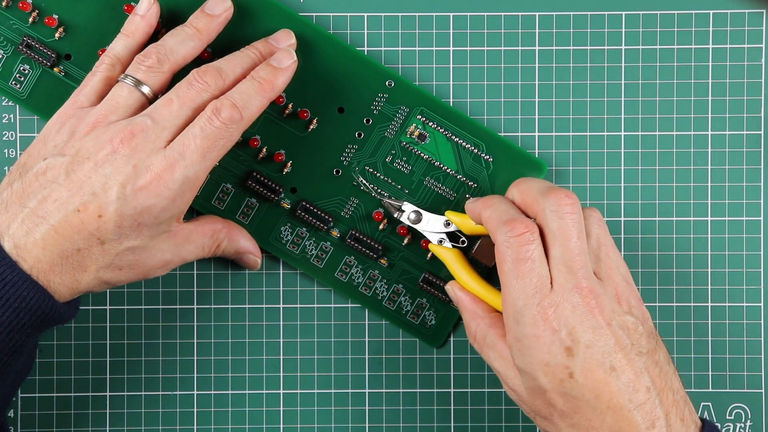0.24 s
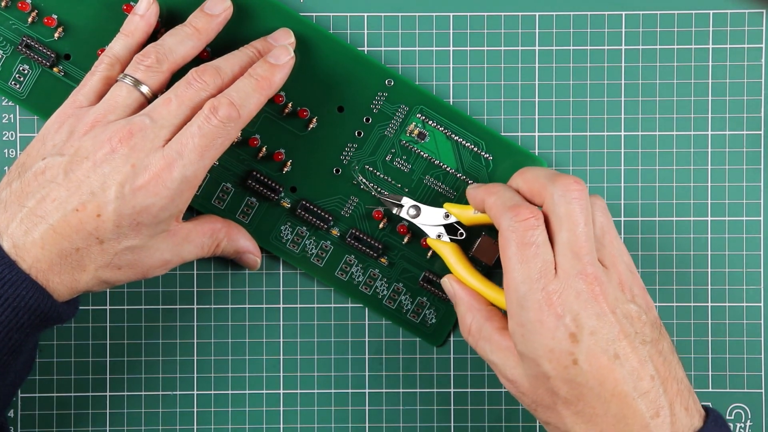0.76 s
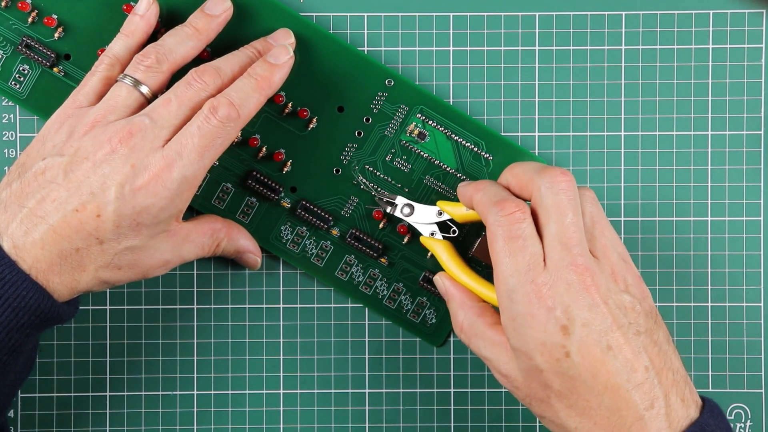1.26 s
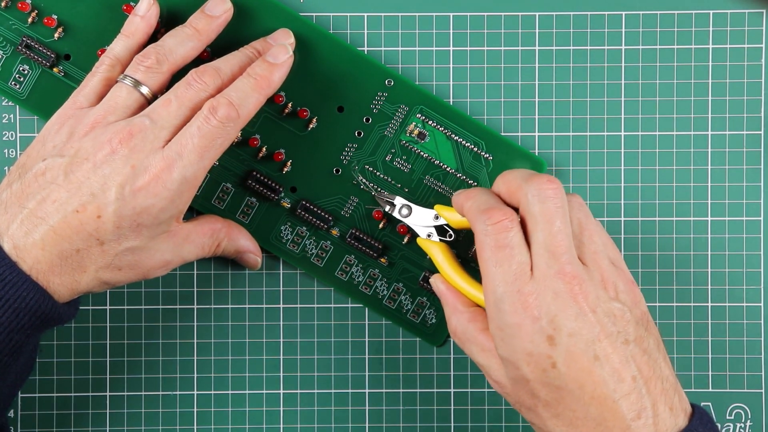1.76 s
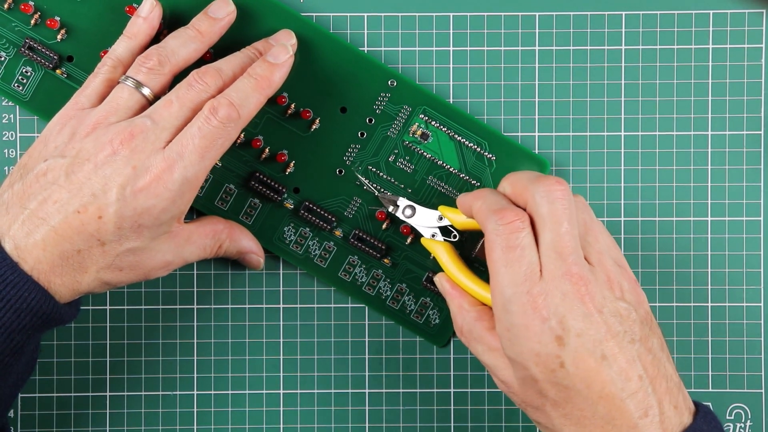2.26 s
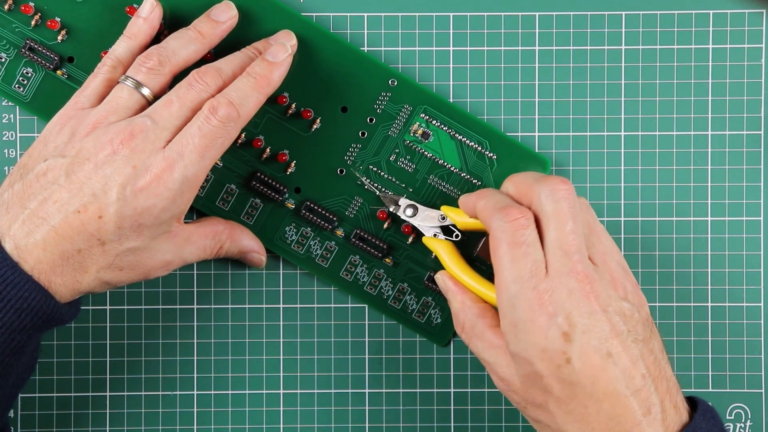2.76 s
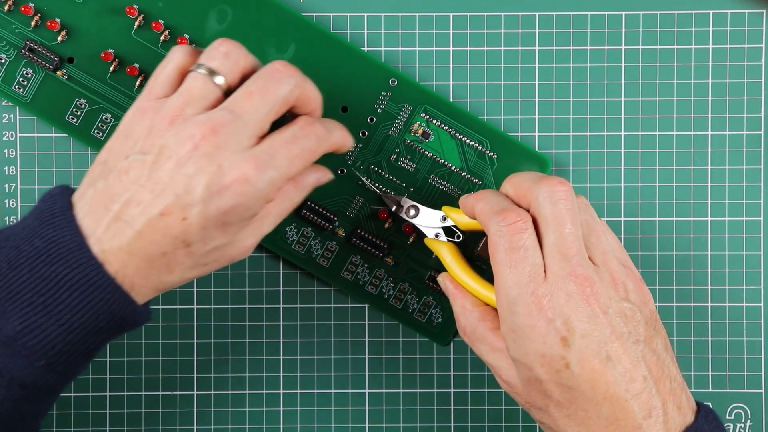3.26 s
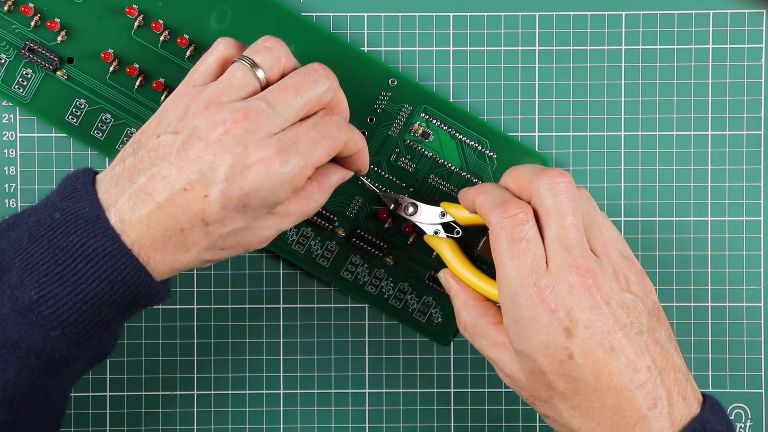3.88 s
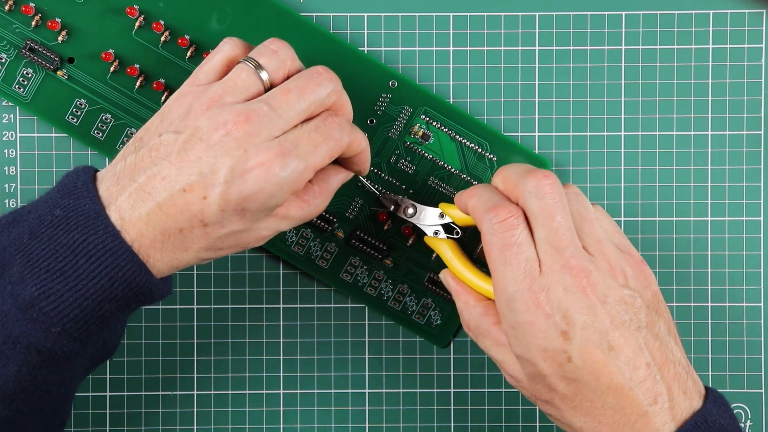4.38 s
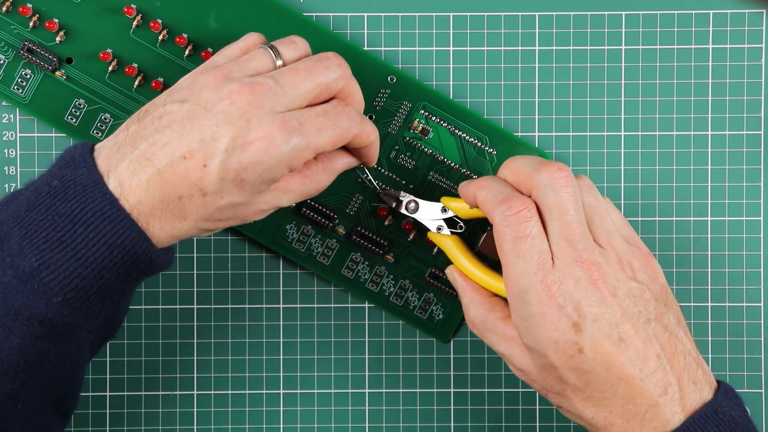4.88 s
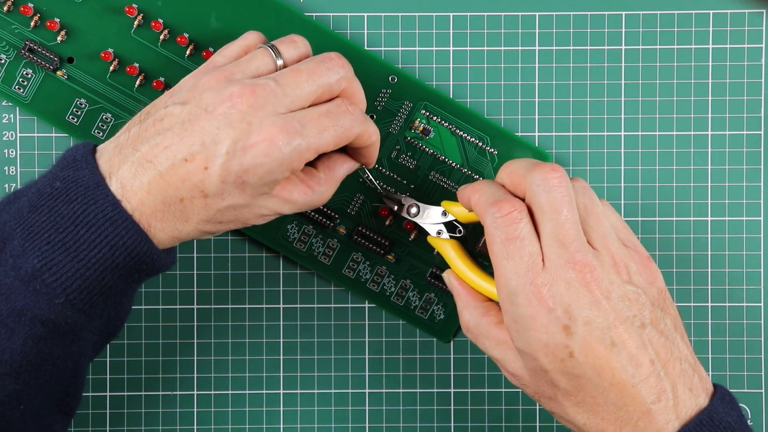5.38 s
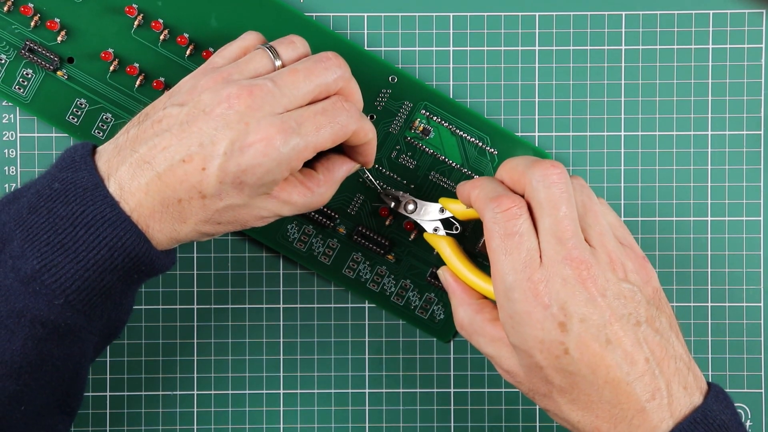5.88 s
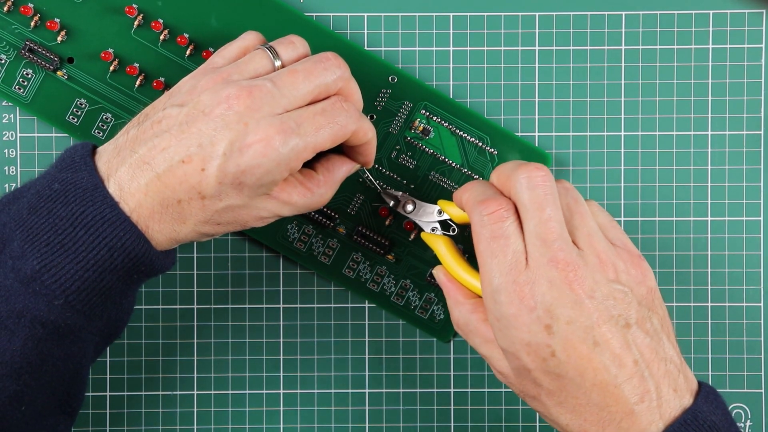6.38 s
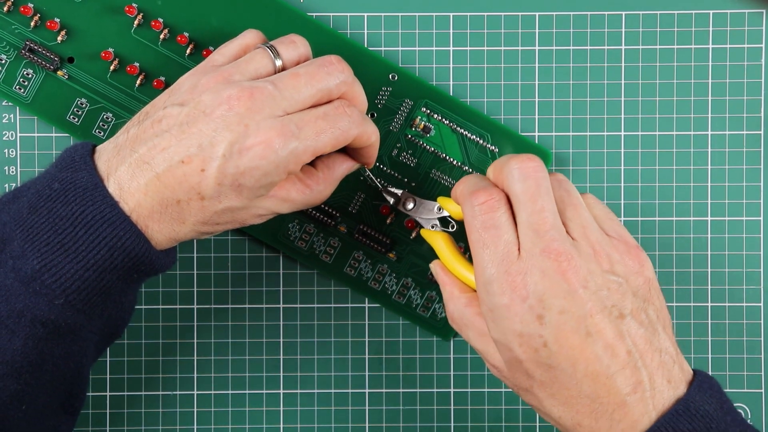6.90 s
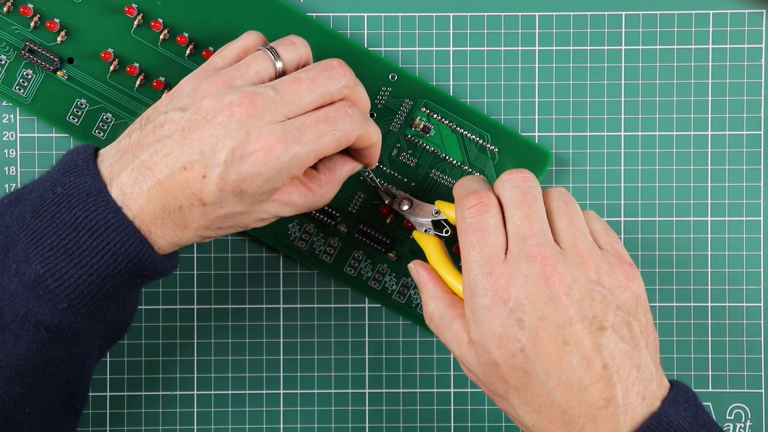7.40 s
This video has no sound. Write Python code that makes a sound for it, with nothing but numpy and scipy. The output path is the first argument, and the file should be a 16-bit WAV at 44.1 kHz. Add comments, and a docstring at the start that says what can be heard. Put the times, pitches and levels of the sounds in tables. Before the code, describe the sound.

Side cutters snip two wire leads off a circuit board with sharp steel cracks, then small ticks, knocks and rubs in a quiet room.

```python
"""Under everything: uneven low rumble and a faint hiss that sinks after loud sounds, in a slightly live room.
At 0.4 s side cutters snip a wire lead off a circuit board: filtered noise bursts crack in steel resonances.
Jaws, leads and fingers then tick, ping, rub and softly bump on the board until the second snip at 2.1 s.
The board knocks on its mat; a finger squeaks at 3.1 s in unsteady sines; small touches go on, with a deep
bench swell at 4.7 s, the busiest ticking from 5.2 to 5.5 s, and a last wire ping at 7.6 s."""
import sys
import numpy as np
from scipy import signal
from scipy.fft import rfft, irfft, next_fast_len
from scipy.io import wavfile
from scipy.ndimage import uniform_filter1d, map_coordinates

SR = 44100
rng = np.random.default_rng(int(sys.argv[2]) if len(sys.argv) > 2 else 0)


def master_out(mix):
    """Clip the mix to full scale and print it as 16-bit PCM to the path in sys.argv[1]."""
    frames = np.transpose(np.atleast_2d(mix))
    ceiling = np.clip(frames, -1, 1)
    pcm = np.round(ceiling * 32767).astype(np.int16)
    wavfile.write(sys.argv[1], SR, pcm)


N = 337365

# rumble spectrum: freq_hz, density_db_per_hz (relative)
RUMBLE_SPECTRUM = [(15, -11.5), (25, -3), (37, -6.5), (50, -1.5), (80, -4), (120, -10), (200, -14),
                   (300, -26), (500, -37), (1500, -90)]
# rumble level over time: time_s, level_db
RUMBLE_LEVEL = [(0, -63), (2.6, -63), (4.55, -62.5), (5.4, -61), (6.2, -66), (7.65, -61)]
# hiss spectrum: freq_hz, density_db_per_hz (relative)
HISS_SPECTRUM = [(200, -12), (400, -5.5), (1000, 0.5), (2000, -5), (4000, -5.5), (8000, -5), (12000, -5.5),
                 (13000, -2.5), (15500, -5.5)]
HISS_DB = -69  # before it sinks
# rate at which a past sound is forgotten: freq_hz, rate_db_per_s
SINK_RETURN = [(400, 43), (2500, 38), (8000, 50.5), (13000, 95)]
# limit of the hiss sinking: freq_hz, depth_db
SINK_DEEPEST = [(400, 19), (3000, 28), (12000, 26), (12600, 15)]
SINK_DELAY_S, SINK_DB_PER_DB, SINK_THRESHOLD_DB = .25, 0.89, 6.5  # threshold is above the hiss

# late room decay: freq_hz, t60_s
ROOM_T60 = [(150, 0.94), (500, 0.42), (1500, 0.48), (3000, 0.55), (7000, 0.37), (11000, 0.31),
            (15000, 0.72)]
# late room spectrum: freq_hz, level_db
ROOM_COLOUR = [(200, -1), (450, 2.5), (1200, 1), (2500, -4.5), (8000, -3), (12000, -4.5), (15000, -5.5)]

# modes of the board on its mat: freq_hz, width_hz, level_db
BOARD = [(310, 20, 0.5), (460, 330, 11), (596, 23, 4), (634, 6.7, -7.5), (817, 44, -8.5), (935, 40, -2),
         (1300, 41, -13.5)]
# modes of the cutters' arms: freq_hz, width_hz, level_db
ARMS = [(1907, 170, 4.5), (2100, 160, 1.5), (2140, 81, -6.5)]
# modes of the cutters' jaws: freq_hz, width_hz, level_db
JAWS = [(2760, 300, 0), (3043, 140, -2), (3380, 160, -5), (3870, 170, 0), (4140, 110, 0), (4470, 130, -4)]
# higher steel modes: freq_hz, width_hz, level_db
RING = [(5600, 400, -7), (6850, 300, -4), (7215, 200, 2), (7840, 300, -2), (8350, 220, -1)]
# highest steel modes, the crack: freq_hz, width_hz, level_db
CRACK = [(8750, 450, 0), (10320, 600, 0), (11330, 500, 0), (12040, 400, -4), (12800, 500, -5),
         (14500, 1200, -15)]
# vibrating parts in the order board, arms, jaws, ring, crack: modes, low_hz, high_hz
PARTS = [(BOARD, 250, 1350), (ARMS, 1300, 2600), (JAWS, 2500, 4700), (RING, 4700, 8600),
         (CRACK, 8400, 14300)]
# tones that ring on after a blow: freq_hz, level_db, t60_s
AFTER_RING = [(311, -2, .45), (436, 0, .36), (583, -6, .35), (1028, -8, .45), (1265, -6, .4),
              (1550, -11, .36), (3068, -9, .6), (7200, -7, .28)]

FIDGET_COUNT, FIDGET_SPAN_S = 8, (3.0, 7.5)
FIDGET_DB, FIDGET_SPREAD_DB = -74, 8.5  # mean, plus or minus spread
# fingers and leads slide: centre_s, scrape_db, hardness_hz, fizz_db, half_s
RUBS = [(0.716, -84, 2000, -52.5, 0.024), (1.037, -60, 800, -66, 0.039), (3.088, -63.5, 6050, -57.5, 0.069),
        (3.349, -56.5, 5000, -54.5, 0.032), (4.76, -66.5, 4560, -67, 0.064),
        (4.93, -75.5, 6030, -60, 0.088), (6.997, -56.5, 4430, -59.5, .023)]
# short unsteady tones, a soft bump at 0.95 s, then fingertip squeaks near 3.1 s:
# centre_s, half_s, pitch_hz, level_db
UNSTEADY_TONES = [(.953, 0.0046, 520, -44.5), (3.087, 0.0056, 1236, -53.5), (3.116, 0.026, 1282, -48.5)]
# a wire end is flicked or lands: start_s, level_db
PINGS = [(0.46, -40), (0.485, -44.5), (0.547, -52), (0.739, -72), (0.947, -63.5), (1.01, -60),
         (1.277, -55.5), (7.6289, -46)]
# ping in each of PARTS: level_db
PING_COLOUR_DB = [-24.5, -16.5, -12.5, -0.5, -8]
PING_T60_S = 0.082
# cutters and leads touch the board: start_s, knock_db, hardness_hz, tick_db, rattle_t60_s
CONTACTS = [(0.4557, -39, 3950.0, -58.6, 0.028), (0.657, -47.5, 3160, -60.4, 0.055),
            (0.688, -64.5, 2170, -53, 0.02), (0.763, -57.5, 950, -61.5, 0.06),
            (1.0918, -47, 1340, -70.5, 0.086), (1.262, -55.5, 1110.0, -58.5, 0.26),
            (1.3305, -44, 1560, -53.7, 0.043), (2.254, -57, 7130.0, -58, 0.013),
            (3.043, -67.5, 4480, -73, 0.012), (3.075, -64, 5480, -49, 0.04),
            (3.137, -63.5, 3950, -82, 0.0084), (3.3311, -55, 6500, -47, 0.048),
            (3.502, -68, 5140.0, -70, 0.1), (3.9319, -64.5, 3320.0, -76, 0.011),
            (4.1916, -53.0, 3700, -56, 0.02), (4.4066, -63.5, 1030, -76.5, 0.086),
            (4.55, -61, 1053, -68.5, 0.15), (5.228, -43.5, 1570, -55, 0.015),
            (5.2354, -43.5, 1590, -59, 0.1), (5.2879, -49, 1550.0, -53, 0.027),
            (5.3322, -45.4, 2040, -51, 0.043), (5.434, -36.8, 2800, -48.5, 0.091),
            (5.4719, -36, 3570, -49, 0.016), (5.643, -62.5, 2540, -62.5, 0.046),
            (5.894, -61.0, 2066, -74, 0.093), (6.391, -52.5, 710, -57.5, 0.13),
            (6.715, -68.8, 2580, -92, 0.075), (7.13, -65, 2700, -78.2, 0.027),
            (7.19, -56, 1120, -66.5, 0.041), (7.3587, -48, 2140.0, -64.5, 0.019)]
# wire tick in each of PARTS: level_db
TICK_COLOUR_DB = [-33, -15, -9.5, -8, 1]
AFTER_CONTACT_DB = -15  # after-ring re knock
# board rocks onto the mat: start_s, direct_peak_db, pitch_hz
KNOCKS = [(2.3452, -27.5, 463), (2.4072, -30.5, 477), (2.8575, -36.5, 460), (2.991, -48.5, 462),
          (5.645, -42.5, 444), (5.791, -49, 482), (7.31, -54.5, 460)]
# a lead parts: start_s, board_db, arms_db, jaws_db, ring_db, crack_db, chatter_t60_s, tear_s, room_db, after_db
SNIPS = [(0.3933, -33.5, -25.5, -21.5, -32.5, -26.5, 0.059, .0014, -3.5, -45.5),
         (2.0741, -38.5, -31.5, -29, -22, -20, 0.0048, .0026, 0.5, -40.5)]
TOP_HZ = 15900


def amp(db):
    """Decibels to gain."""
    return 10 ** (np.asarray(db) / 20)


def unit(x):
    """Scale to rms 1."""
    return x / np.sqrt(np.mean(x ** 2) + 1e-20)


def along(points, hz):
    """Interpolate (freq_hz, value) points on a log frequency axis."""
    point_hz, values = np.transpose(points)
    return np.interp(np.log(hz + 1), np.log(point_hz), values)


def curves(rows):
    """Interpolate each column after time_s to one value per sample."""
    time_s, *columns = np.transpose(rows)
    return [np.interp(np.arange(N) / SR, time_s, column) for column in columns]


def filtered(x, response):
    """Multiply the spectrum of x by response(freq_hz)."""
    size = next_fast_len(len(x) + 8192)
    return irfft(rfft(x, size) * response(np.fft.rfftfreq(size, 1 / SR)), size)[:len(x)]


def add(track, start_s, sound):
    """Mix a sound into the track at start_s."""
    i = max(round(start_s * SR), 0)
    track[i:i + len(sound)] += sound[:max(N - i, 0)]


def room(x, early_db, late_db, direct=True, early_t60_s=0.069):
    """Near things answer early; the walls' tail builds up and decays at a rate set by frequency."""
    t = np.arange(SR * 3 // 4) / SR
    hz, frames_s, z = signal.stft(rng.standard_normal(len(t)), SR, nperseg=256)
    fade_db = along(ROOM_COLOUR, hz)[:, None] - 60 * frames_s / along(ROOM_T60, hz)[:, None]
    build_up = 1 - np.exp(-t / .022)
    late = signal.istft(z * amp(fade_db), SR, nperseg=256)[1][:len(t)] * build_up
    early = rng.standard_normal(len(t)) * amp(-60 * t / early_t60_s) * (t > .003)
    answer = amp(early_db) * early / np.linalg.norm(early)
    answer += amp(late_db) * late / np.linalg.norm(late)
    return signal.fftconvolve(x, answer + direct * (t == 0))


def resonate(force, levels_db, dense_db=-11):
    """A force rings the modes of each part; a level is that part's energy spread over 10 ms."""
    out = np.zeros(len(force))
    for (modes, low_hz, high_hz), db in zip(PARTS, levels_db):
        def response(f):
            return sum(amp(g) * 1j * f * w / (c * c - f * f + 1j * f * w) for c, w, g in modes)

        # unfiltered force stands for weak, damped modes between the clear ones
        ring = filtered(force, response) + amp(dense_db) * force
        band = signal.butter(3, [low_hz, high_hz], "band", fs=SR, output="sos")
        ring = signal.sosfilt(band, ring)
        out += amp(db) * ring / np.linalg.norm(ring) * np.sqrt(SR / 100)
    return out


def softened(hz, hardness_hz):
    """Gain of a soft touch: it hardly drives frequencies above its hardness."""
    return 1 / np.sqrt(1 + (hz / hardness_hz) ** 6)


def touch_levels_db(knock_db, hardness_hz, tick_db):
    """Level of each part: a dull knock power-summed with a thin wire tick."""
    centres_hz = np.array([np.sqrt(low_hz * high_hz) for _, low_hz, high_hz in PARTS])
    knock = amp(knock_db) * softened(centres_hz, hardness_hz)
    tick = amp(tick_db + np.array(TICK_COLOUR_DB))
    return 20 * np.log10(np.hypot(knock, tick))


def tap(levels_db, t60_s, push_db=-1, rise_s=0.00052):
    """A light blow: one sharp push and a short rattle of the touching parts."""
    t = np.arange(SR // 8) / SR
    rattle = rng.standard_normal(len(t)) * amp(-60 * t / t60_s) * (1 - np.exp(-t / rise_s))
    force = amp(push_db) * (t == 0) + rattle / np.linalg.norm(rattle)
    # room wash: same part levels, softer peaks
    around = resonate((t == 0) * 1., levels_db, dense_db=-7)
    sound = room(around, early_db=-9.0, late_db=-10.0, direct=False)
    sound[:len(t)] += resonate(force, levels_db)
    return sound


def coloured_noise(spectrum):
    """Gaussian noise of rms 1 shaped by a spectrum table."""
    return unit(filtered(rng.standard_normal(N), lambda f: amp(along(spectrum, f))))


def rumble():
    """Low room noise whose level wanders slowly."""
    lumps_db = 2.5 * map_coordinates(rng.standard_normal(96), [np.linspace(0, 95, N)])
    return coloured_noise(RUMBLE_SPECTRUM) * amp(curves(RUMBLE_LEVEL)[0] + lumps_db)


def sinking_hiss(sounds):
    """Hiss turned down, band by band, by a late, fading memory of the louder sounds."""
    hiss = amp(HISS_DB) * coloured_noise(HISS_SPECTRUM)
    hz, frames_s, (z, loud) = signal.stft(np.array([hiss, sounds]), SR, nperseg=512)
    hiss_power = np.mean(np.abs(z) ** 2, axis=1, keepdims=True).clip(1e-14)
    over = uniform_filter1d(np.abs(loud) ** 2, size=9, axis=0) / hiss_power
    keep = amp(-along(SINK_RETURN, hz) * frames_s[1]) ** 2  # power kept per frame
    memory = []
    for band, k in zip(over, keep):
        faded = signal.lfilter([1 - k], [1, -k], np.abs(band))
        memory.append(np.interp(frames_s - SINK_DELAY_S, frames_s, faded, left=0))
    gain = (1 + np.array(memory) / amp(SINK_THRESHOLD_DB) ** 2) ** (-SINK_DB_PER_DB / 2)
    least = amp(-along(SINK_DEEPEST, hz))[:, None]
    return signal.istft(z * np.maximum(gain, least), SR, nperseg=512)[1][:N]


def bump():
    """A hand shifts its weight on the bench: a soft, deep swell of narrow-band noise."""
    centre_s, half_s, centre_hz, width_hz, level_db = 4.68, .08, 42, 30, -52
    swell = np.exp(-((np.arange(N) / SR - centre_s) / half_s) ** 2)
    low = unit(filtered(rng.standard_normal(N), lambda f: np.exp(-((f - centre_hz) / width_hz) ** 2)))
    return amp(level_db) * swell * low


def fidgets(hardness_hz=2200, tick_db=-80, t60_s=0.099):
    """Barely audible taps at chance moments while the fingers hold a lead."""
    out = np.zeros(N)
    for when, strength in rng.random((FIDGET_COUNT, 2)):
        knock_db = FIDGET_DB + FIDGET_SPREAD_DB * (2 * strength - 1)
        start_s = np.interp(when, [0, 1], FIDGET_SPAN_S)
        add(out, start_s, tap(touch_levels_db(knock_db, hardness_hz, tick_db), t60_s, push_db=-17))
    return out


def rubs(grain_db=4):
    """A slide is a swell of tiny uneven slips driving the parts' resonances."""
    out, t = np.zeros(N), np.arange(-SR // 8, SR // 8) / SR
    for centre_s, scrape_db, hardness_hz, fizz_db, half_s in RUBS:
        slips = rng.standard_normal(len(t)) * amp(grain_db * rng.standard_normal(len(t)))
        force = slips * np.exp(-(t / half_s) ** 2)
        slide = resonate(force, touch_levels_db(scrape_db, hardness_hz, fizz_db))
        add(out, centre_s + t[0], room(slide, early_db=-15, late_db=-8.5))
    return out


def unsteady_tones(waver=0.011):
    """Brief sines of wavering pitch: a soft low bump, then squeaks of skin slipping at a nearly even rate."""
    out, t = np.zeros(N), np.arange(-SR // 8, SR // 8) / SR
    for centre_s, half_s, pitch_hz, level_db in UNSTEADY_TONES:
        drift = unit(uniform_filter1d(rng.standard_normal(len(t)), size=200))
        phase = 2 * np.pi * np.cumsum(pitch_hz * (1 + waver * drift)) / SR
        tone = np.sqrt(2) * amp(level_db) * np.sin(phase) * np.exp(-(t / half_s) ** 2)
        add(out, centre_s + t[0], room(tone, early_db=-14, late_db=-14.0))
    return out


def pings():
    """A light wire end rings the high steel resonances and hardly moves the board."""
    out = np.zeros(N)
    for start_s, level_db in PINGS:
        add(out, start_s, tap(level_db + np.array(PING_COLOUR_DB), PING_T60_S, push_db=-9))
    return out


def contacts():
    """Jaws and leads tap the board, which rings on faintly in decaying sines."""
    out, t = np.zeros(N), np.arange(SR // 2) / SR
    for start_s, knock_db, hardness_hz, tick_db, rattle_t60_s in CONTACTS:
        add(out, start_s, tap(touch_levels_db(knock_db, hardness_hz, tick_db), rattle_t60_s))
        for freq_hz, level_db, t60_s in AFTER_RING:
            ring_db = knock_db + AFTER_CONTACT_DB + level_db + rng.normal(0, 1.8)
            envelope = softened(freq_hz, hardness_hz) * amp(ring_db - 60 * t / t60_s)
            add(out, start_s, envelope * np.sin(2 * np.pi * freq_hz * t))
    return out


def knocks(t60_s=0.013, rise_s=0.00046):
    """The board tips and lands on the soft mat: a heavily damped, very short thud."""
    out, t = np.zeros(N), np.arange(SR // 20) / SR
    for start_s, peak_db, pitch_hz in KNOCKS:
        envelope = amp(-60 * t / t60_s) * (1 - np.exp(-(t / rise_s) ** 2))
        # sound follows the board's speed as it springs back
        thud = np.gradient(np.sin(2 * np.pi * pitch_hz * t) * envelope)
        thud *= amp(peak_db) / np.abs(thud).max()
        add(out, start_s, room(thud, early_db=-7.5, late_db=-13.5))
    return out


def snips(chatter_db=-9):
    """The wire tears in a millisecond or two, the jaws slam shut and chatter, and the jolted board rings on."""
    out, t = np.zeros(N), np.arange(SR // 2) / SR
    for start_s, *levels_db, chatter_t60_s, tear_s, room_db, after_db in SNIPS:
        envelope = np.exp(-(t / tear_s) ** 4) + amp(chatter_db - 60 * t / chatter_t60_s)
        add(out, start_s, resonate(rng.standard_normal(len(t)) * envelope, levels_db))
        # room wash: same part levels, softer peaks
        around = resonate((t == 0) * 1., levels_db, dense_db=0.5)
        add(out, start_s, room(around, early_db=-10, late_db=-8.5 + room_db, direct=False))
        for freq_hz, level_db, t60_s in AFTER_RING:
            add(out, start_s, amp(after_db + level_db - 60 * t / t60_s) * np.sin(2 * np.pi * freq_hz * t))
    return out


def scene():
    """Sum all sources in one channel; the sounds also control the hiss."""
    sounds = bump() + fidgets() + rubs() + unsteady_tones() + pings() + contacts() + knocks() + snips()
    return (rumble() + sinking_hiss(sounds) + sounds)[None]


def record(dry):
    """Very steep low-pass at TOP_HZ."""
    return np.array([filtered(x, lambda f: 1 / np.sqrt(1 + (f / TOP_HZ) ** 200)) for x in dry])


dry = scene()
out = record(dry)
master_out(out)
```